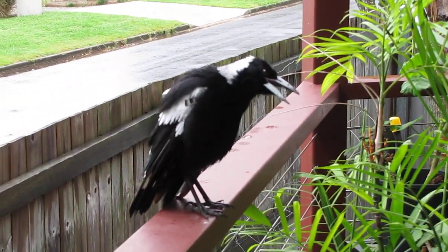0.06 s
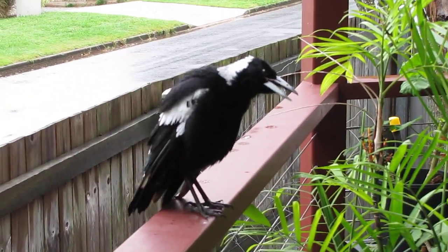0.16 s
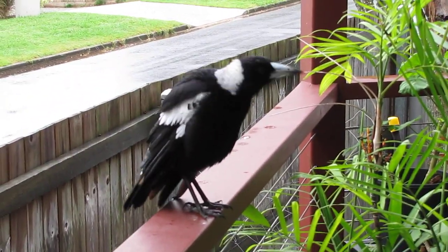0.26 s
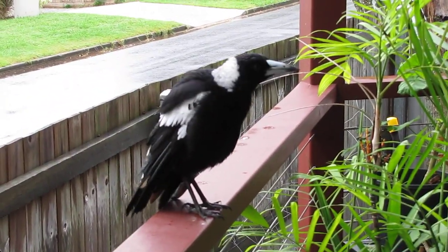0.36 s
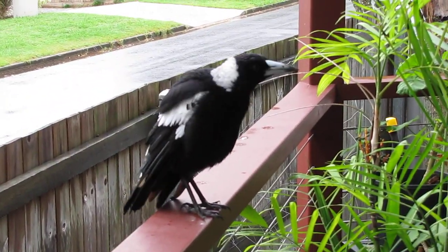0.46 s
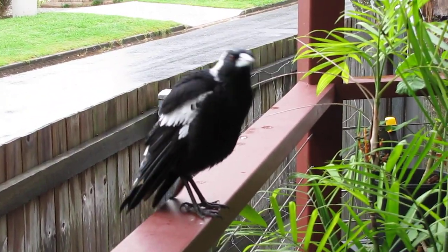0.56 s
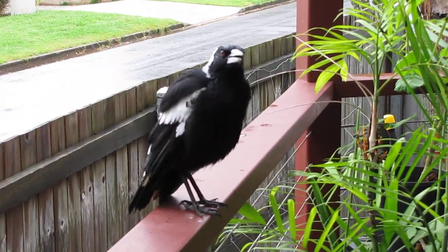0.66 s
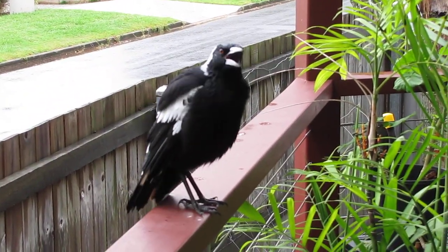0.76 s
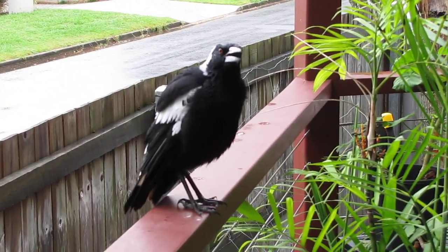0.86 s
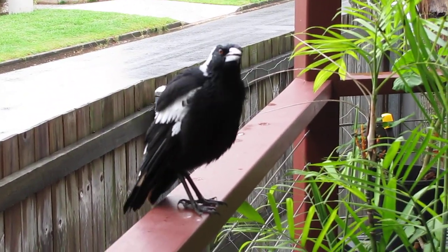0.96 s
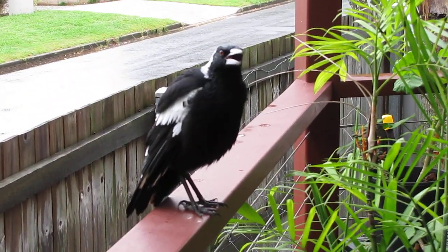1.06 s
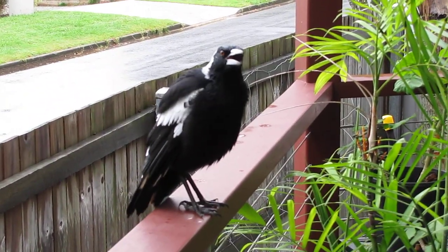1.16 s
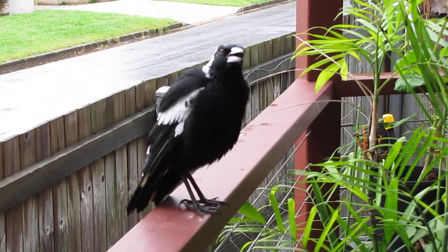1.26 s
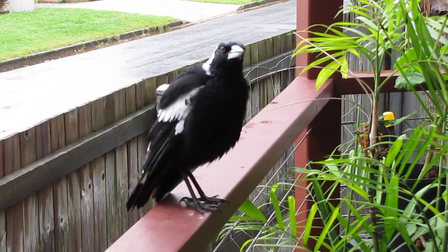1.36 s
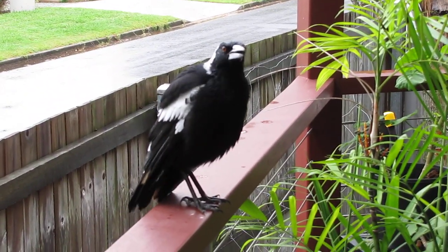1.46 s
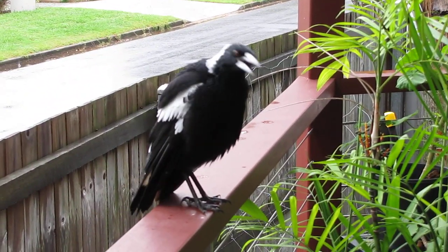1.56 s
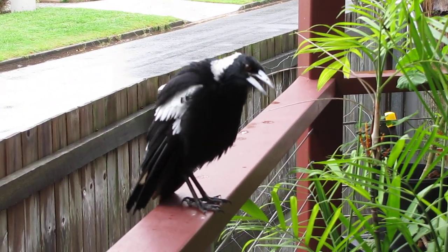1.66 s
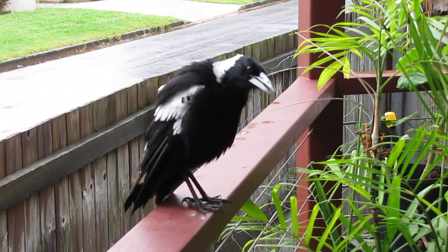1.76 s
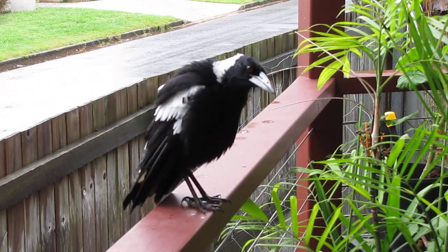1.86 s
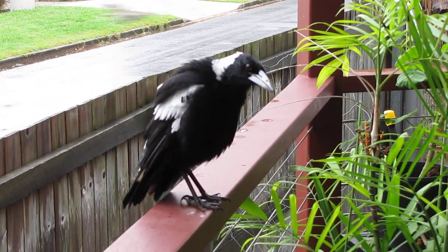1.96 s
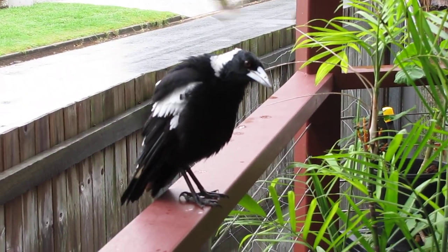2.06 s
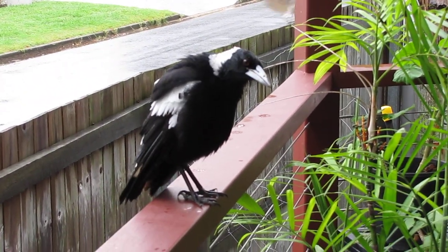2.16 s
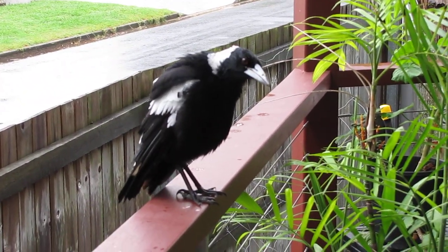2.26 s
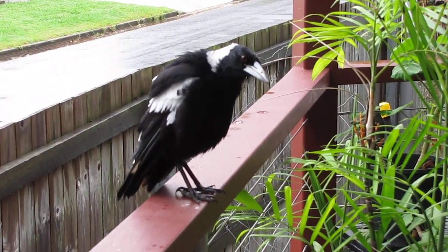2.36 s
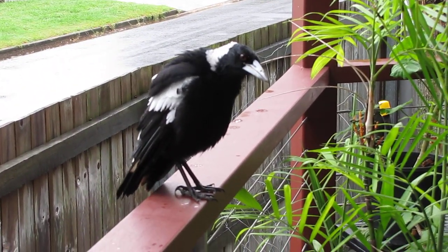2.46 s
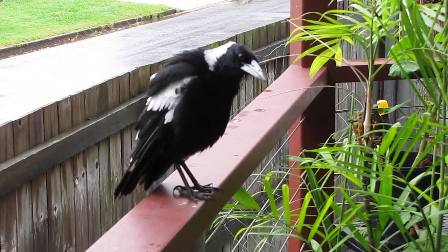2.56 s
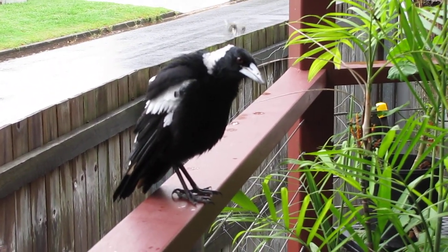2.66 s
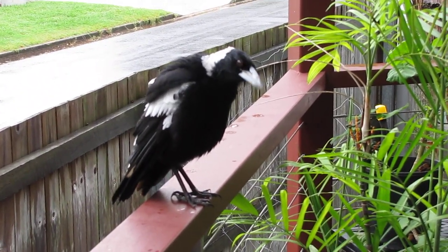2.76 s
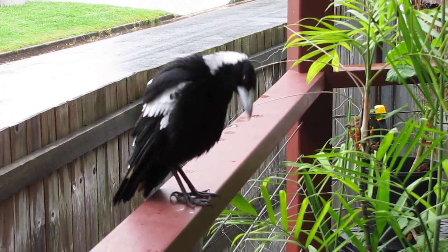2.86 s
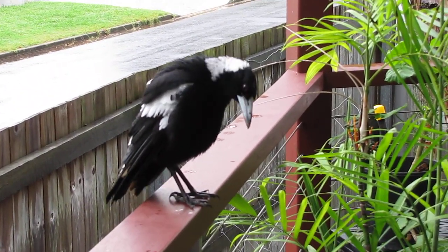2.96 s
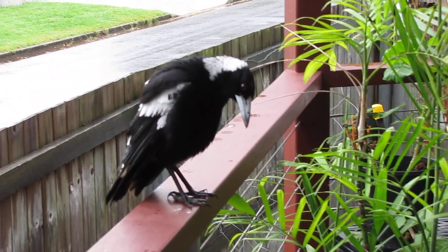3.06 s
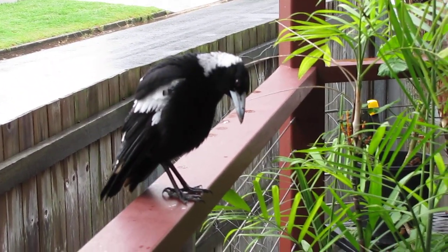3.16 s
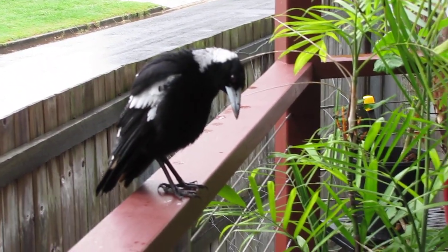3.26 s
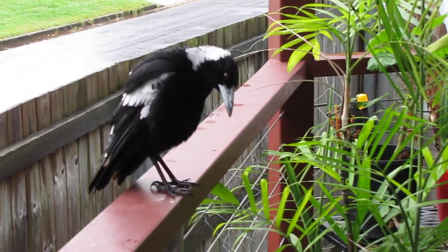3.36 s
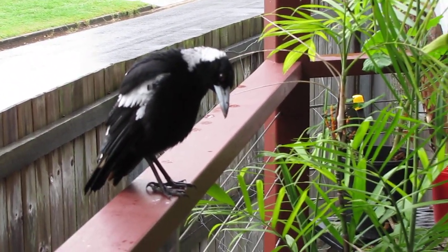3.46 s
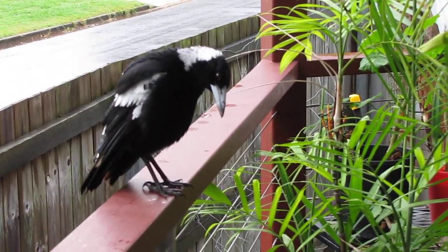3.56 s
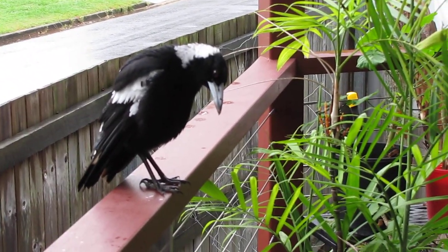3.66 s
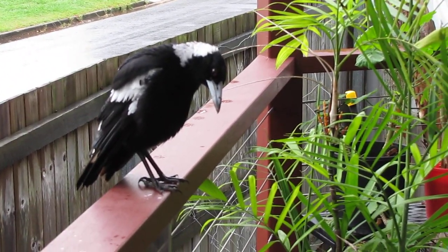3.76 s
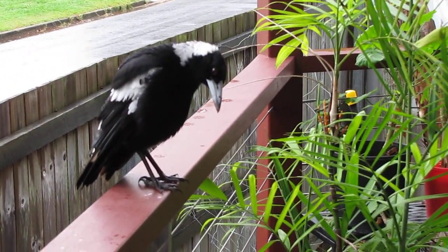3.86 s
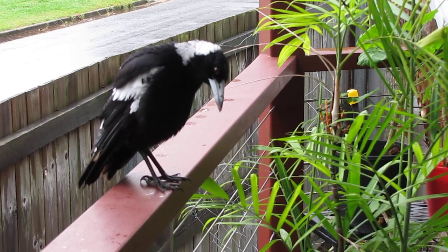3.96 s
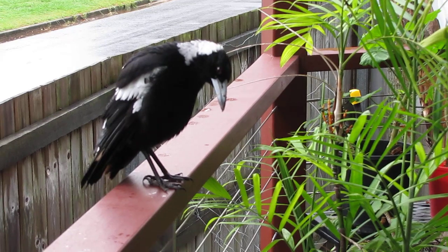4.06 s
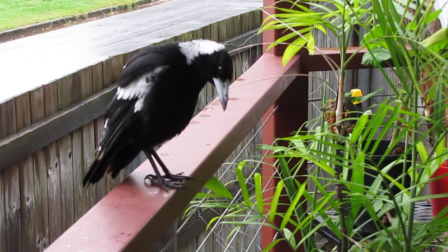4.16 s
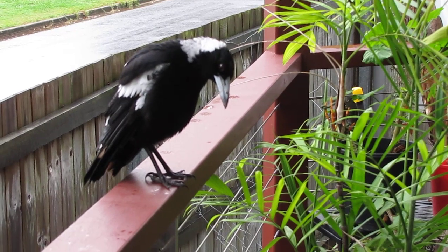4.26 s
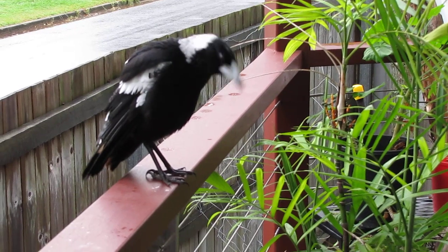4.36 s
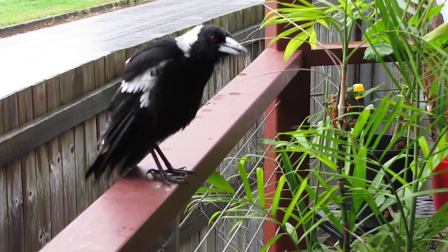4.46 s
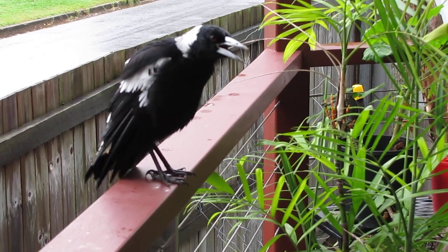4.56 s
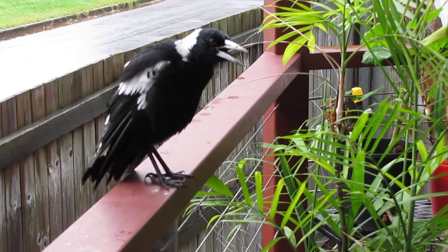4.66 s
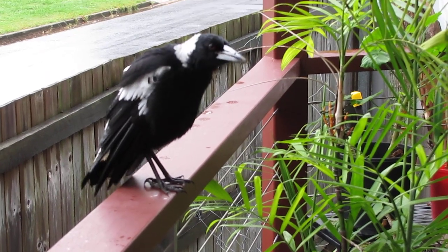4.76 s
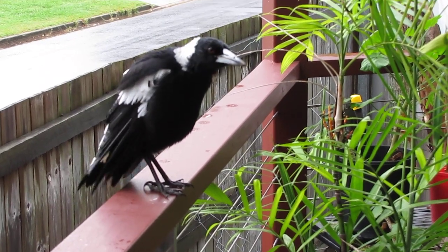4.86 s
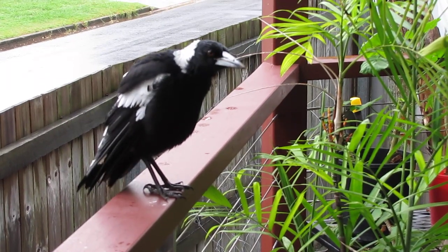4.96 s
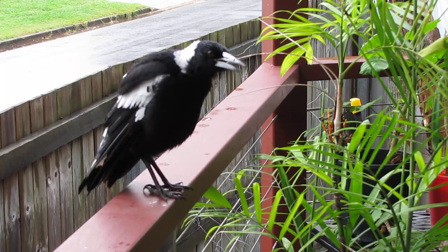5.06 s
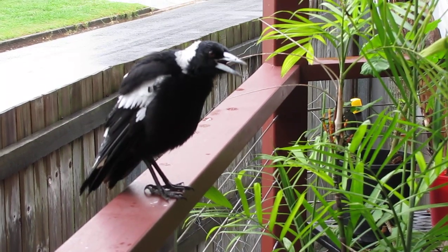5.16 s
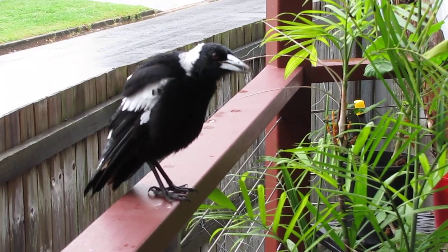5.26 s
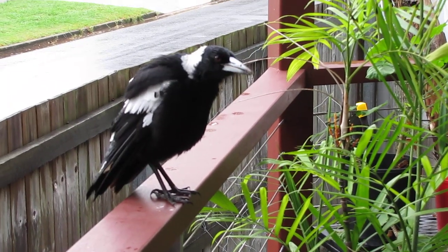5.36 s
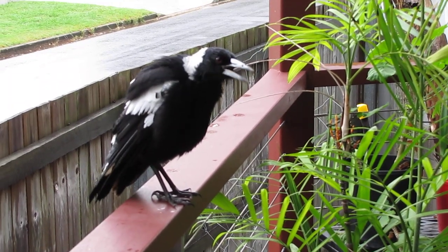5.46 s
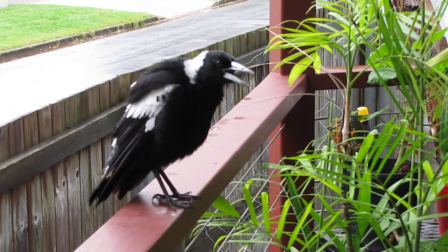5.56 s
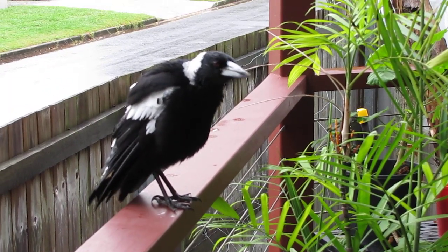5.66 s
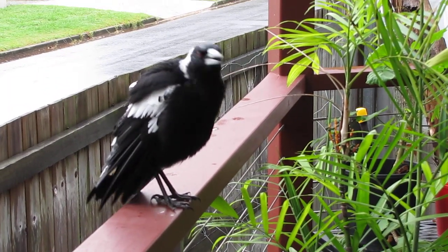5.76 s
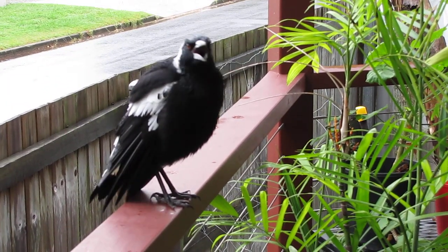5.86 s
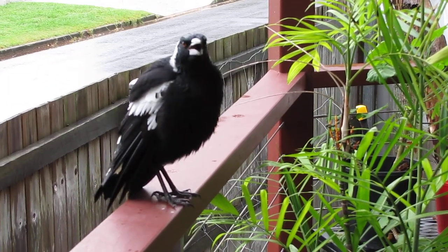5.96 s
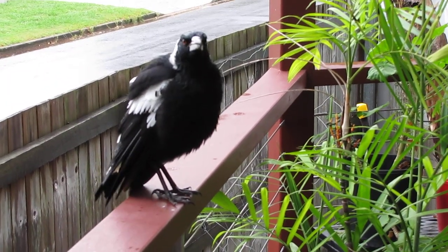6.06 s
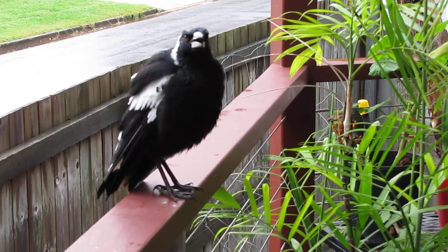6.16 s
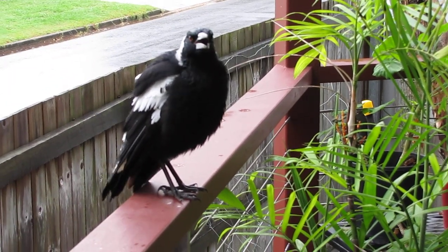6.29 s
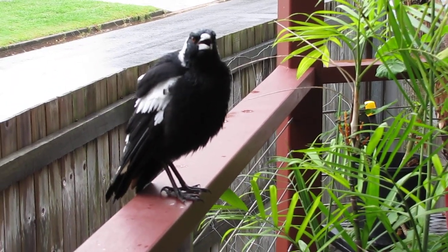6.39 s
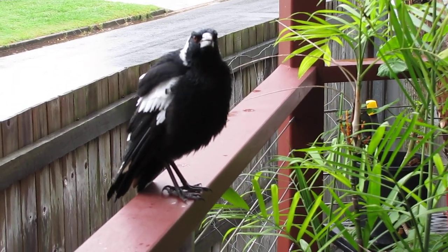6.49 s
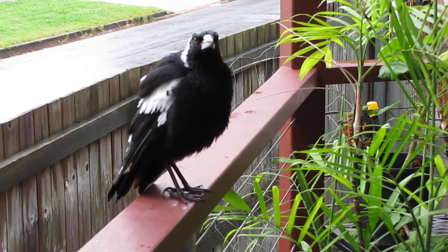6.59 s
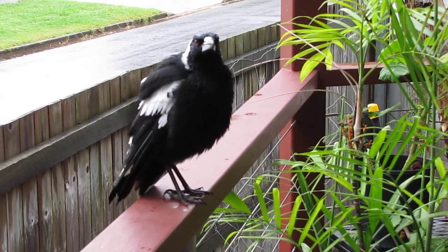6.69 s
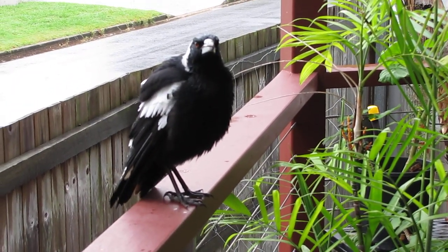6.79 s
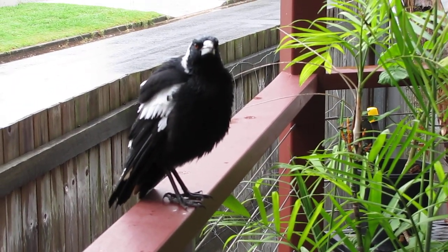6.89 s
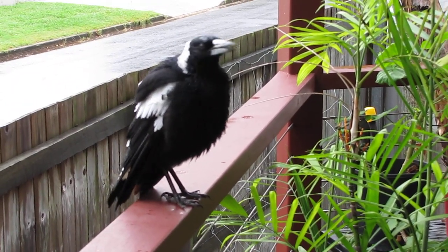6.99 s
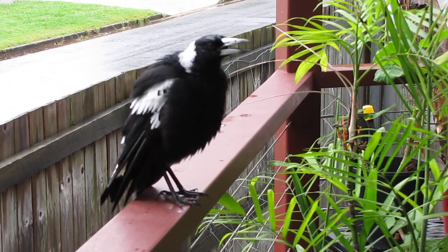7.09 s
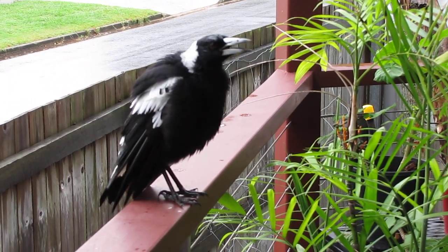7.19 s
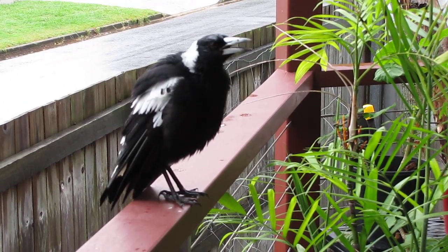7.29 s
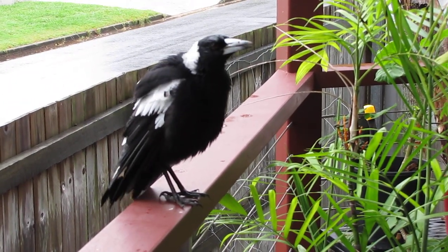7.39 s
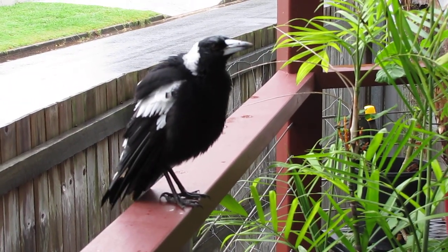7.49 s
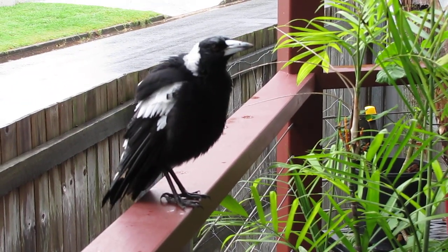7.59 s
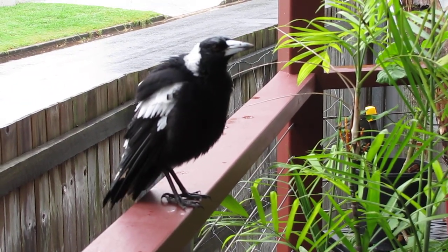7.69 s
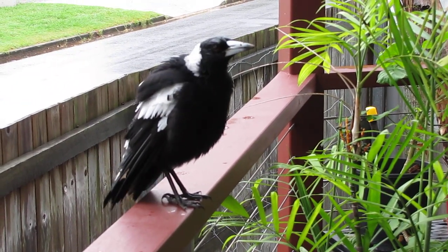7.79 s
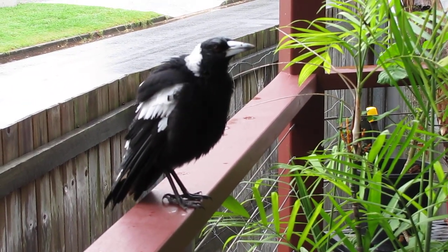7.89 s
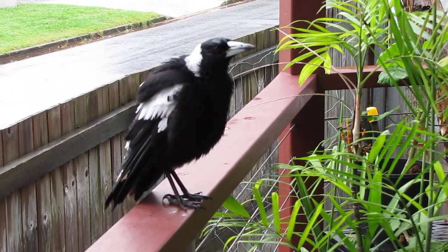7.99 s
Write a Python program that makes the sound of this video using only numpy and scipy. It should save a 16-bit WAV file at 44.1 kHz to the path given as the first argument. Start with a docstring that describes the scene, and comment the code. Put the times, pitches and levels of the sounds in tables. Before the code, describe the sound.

A single magpie calls close to a stereo microphone on a wet veranda. A harsh squawk opens, then another leads into two loud, clear falling whistles. Much softer, rising chirps chatter through the middle. Three more fluttering squawks come, then a fourth runs into a falling whistle and one last whistle ends the calling. Behind are faint low rumble, wet hiss and small drips, with short reflections from fence and wall.

```python
"""A harsh squawk opens; loud falling whistles, yelps and soft rising chatter follow from a magpie close by.
It sits on a veranda rail on a wet day. Its voice is a stack of harmonics: clean in the whistles, with a
faint rasp, and shaken by a fast flutter in the squawks. Veranda and fence answer with early copies of the
sound and a short noise tail; behind are a low outdoor rumble and a wet hiss, both coloured noise,
and a few drips made of noise bursts and short rings."""
import sys
import numpy as np
from scipy import signal
from scipy.fft import rfft, irfft, next_fast_len
from scipy.io import wavfile
from scipy.ndimage import map_coordinates

SR = 44100
rng = np.random.default_rng(int(sys.argv[2]) if len(sys.argv) > 2 else 0)


def wrap_up_sound(samples):
    """Save the sound to the file named by the first command line argument, as 16-bit audio."""
    columns = np.atleast_2d(samples).T
    # keep every value between -1 and 1, then stretch to whole-number steps
    tamed = np.clip(columns, -1, 1)
    steps = np.round(tamed * 32767).astype(np.int16)
    wavfile.write(sys.argv[1], SR, steps)


N = 354211
TIME = np.arange(N) / SR  # s
FFT_SIZE = next_fast_len(N + SR, True)
BINS = np.fft.rfftfreq(FFT_SIZE, 1 / SR)  # Hz


def amp(db):
    """Decibels to gain."""
    return 10 ** (np.asarray(db) / 20)


def unit(x):
    """Scale to rms 1."""
    return x / np.sqrt(np.mean(x ** 2) + 1e-20)


def ramp(x):
    """Keep between 0 and 1."""
    return np.clip(x, 0, 1)


def clock(length):
    """The times of the samples of one call."""
    return TIME[:int(length * SR)]


def along(points, hz):
    """(frequency [Hz], value) points read on a log frequency axis."""
    f, v = np.transpose(points)
    return np.interp(np.log(np.abs(hz) + 1), np.log(f + 1), v)


def filtered(x, response):
    """The full-length x through a response given on BINS."""
    return irfft(rfft(x, FFT_SIZE) * response, FFT_SIZE)[..., :N]


def shaped(x, gain):
    """One call through a gain that is a function of frequency."""
    m = next_fast_len(len(x) + 4096, True)
    return irfft(rfft(x, m) * gain(np.fft.rfftfreq(m, 1 / SR)), m)[:len(x)]


def wobble(rate, size=N):
    """A smooth random curve of rms 1, rate knots a second."""
    knots = rng.standard_normal(int(size * rate / SR) + 4)
    return unit(map_coordinates(knots, [TIME[:size] * rate]))


def noise(spectrum):
    """Coloured noise of rms 1."""
    return unit(filtered(rng.standard_normal(N), amp(along(spectrum, BINS))))


def turns(hz):
    """Running phase [rad] of a frequency curve."""
    return 2 * np.pi * np.cumsum(hz) / SR


def stack(pitch, gain, count):
    """Harmonics of a pitch curve, one row each, weighted by gain at their momentary frequency."""
    phase = turns(pitch)
    rows = []
    for k in range(1, count + 1):
        hz = k * pitch
        audible = hz < SR / 2
        rows.append(gain(hz) * audible * np.sin(k * phase + rng.uniform(0, 2 * np.pi)))
    return np.array(rows)


def edges(t, edge):
    """A gate that opens and closes within edge seconds."""
    return ramp(np.minimum(t, t[-1] - t) / edge)


def glide(t, start, end, bend):
    """From start to end over a call; bend 1 levels off, above 1 arches over, below 0 speeds up."""
    u = t / t[-1]
    return start + (end - start) * (u + bend * u * (1 - u))


def add(track, s, sound):
    """Mix a sound in at time s, or at the very start if s is negative."""
    part = track[max(round(s * SR), 0):][:len(sound)]
    part += sound[:len(part)]


def squawks():
    """Harsh calls, coloured by the posture of neck and bill."""
    # throat and bill in three postures: (frequency [Hz], level [dB])
    half_shut = [(700, -16.5), (1150, -14), (1550, -1.5), (2250, 3), (2850, 2), (3300, -12), (3750, -17.5),
                 (4200, -7.5), (4550, -17), (4900, -9), (5300, -14), (6400, -7.5), (7500, -21.5),
                 (8500, -20), (11500, -29.5), (15000, -39)]
    neck_stretched = [(900, -11.5), (1500, -3), (2050, -1.5), (2400, 16), (2750, 6), (3100, -3), (3400, -7),
                      (3900, -14), (4650, -17.5), (5000, -22), (5450, -3.5), (6400, -16), (7100, -13.5),
                      (9000, -28.5), (11500, -29), (15500, -40)]
    bill_wide = [(900, -25), (1550, -6.5), (2300, 2), (2800, 2), (3100, -8.5), (3500, -7.5), (4400, -14),
                 (5000, -8), (5700, -1), (6500, -7.5), (7200, -9.5), (9000, -19.5), (11500, -22),
                 (15500, -33)]
    # calls: (time [s], length [s], attack [s], swell [dB], release [s], level [dB], start [Hz], end [Hz],
    # bend, sag after [s], sag [Hz], start flutter [Hz], end flutter [Hz], start roughness [0-1],
    # end roughness [0-1], treble against body [dB], posture)
    calls = [(-.004, .18, 0.17, 7, 0.071, -16, 1097, 1169, -0.37, 0.034, 30.2, 153.9, 158, 0.39, 0.33, -2, "half shut"),
             (0.685, 0.18, 0.053, 15, 0.05, -15.5, 1535, 1360, -0.85, .1, 43.6, 167.4, 158.6, 0.6, 0.48, -5, "stretched"),
             (4.525, 0.18, 0.032, -1.5, 0.02, -16, 1100, 1191, 1.36, 0.12, 56, 165.6, 150.5, 0.51, 0.21, 1.5, "half shut"),
             (5.059, 0.17, 0.12, 27.5, 0.059, -16, 1145, 1230, -0.59, 0.068, 64, 149, 146, 0.78, 0.31, -2.5, "half shut"),
             (5.43, 0.17, 0.11, 13.5, 0.04, -16.5, 1733, 1386, 0, 0.0325, 57.4, 167.2, 143.2, 0.83, 0.36, -6, "wide open"),
             (5.772, 0.2, 0.15, 17, 0.061, -15, 1997, 1490, 0.7, 0.077, 80, 200.5, 153.3, 0.77, 0.4, -3.5, "wide open")]
    postures = {
        "half shut": dict(throat=half_shut, split_hz=2400, swing=0.089, throb_db=2.5,
                          jitter=0.037, chaos=0.33, low_sway=0.79),
        "stretched": dict(throat=neck_stretched, split_hz=3900, swing=0.09, throb_db=0.6,
                          jitter=0.031, chaos=0.28, low_sway=1.3),
        "wide open": dict(throat=bill_wide, split_hz=4130, swing=0.11, throb_db=1.5,
                          jitter=0.037, chaos=1.5, low_sway=1.19)}
    out = np.zeros(N)
    for s, *row, posture in calls:
        add(out, s, squawk(row, **postures[posture]))
    return out


def squawk(row, throat, split_hz, swing, throb_db, jitter, chaos, low_sway):
    """A fast flutter of the syrinx swings pitch and loudness, so each harmonic splits into sidebands."""
    (length, attack, swell_db, release, level_db, start_hz, end_hz, bend, sag_at, sag_hz,
     flutter_from, flutter_to, rough_from, rough_to, treble_db) = row
    fade_db, curve = 13, 1.97  # drop over the release; bow of attack and release
    treble_lag_db, treble_lag_s = 12.5, 0.072  # the call starts dull and brightens
    calm_onset, calm_s = 0.37, 0.029  # share of the swing missing at the start, and for how long
    sag_s = 0.02786  # the pitch sags briefly in mid-squawk
    t = clock(length)
    shake = lambda rate: wobble(rate, size=len(t))

    fade = ramp(1 - (length - t) / release) ** curve
    db = level_db - swell_db * ramp(1 - t / attack) ** curve - fade_db * fade
    rough = glide(t, rough_from, rough_to, 0)
    flutter_hz = glide(t, flutter_from, flutter_to, bend=0.21) * (1 + 0.137 * rough * shake(204))
    flutter = turns(flutter_hz)

    # the pitch lingers at both ends of its swing
    grip = 1 - ramp(calm_onset) * np.exp(-(t / calm_s) ** 2)
    sway = grip * (swing * np.tanh(1.32 * np.sin(flutter)) + jitter * rough * shake(700))
    centre = glide(t, start_hz, end_hz, bend) - sag_hz * np.exp(-((t - sag_at) / sag_s) ** 2)
    pitch = centre * (1 + sway)
    throb = amp(throb_db * np.cos(flutter + 0.67) + 2 * rough * shake(341.5))

    # each harmonic waxes and wanes on its own; the fundamental sways by its own share
    overtones = stack(pitch, lambda hz: amp(2 * shake(70)), count=13)[1:].sum(axis=0)
    fundamental = amp(2 * shake(92.3)) * np.sin(turns(centre * (1 + low_sway * sway)))
    source = unit(fundamental + overtones)
    # at its roughest the cycles alternate irregularly and fill the gaps between harmonics
    source = source * (1 + chaos * (grip * rough) ** 2 * shake(501) * np.sin(turns(pitch) / 2))
    air = amp(-25) * rng.standard_normal(len(t))
    voice = shaped(throb * (source + air), lambda hz: amp(along(throat, hz)))

    # the treble comes up after the start and drops away in the release
    body = shaped(voice, lambda hz: 1 / (1 + (hz / split_hz) ** 12))
    bright = amp(treble_db - treble_lag_db * np.exp(-t / treble_lag_s) - 11 * fade)
    balanced = (unit(body) + bright * unit(voice - body)) / np.sqrt(1 + bright ** 2)
    return edges(t, edge=0.002) * amp(db) * balanced


def whistles():
    """Each whistle breaks in with a low yelp and a swoop from above onto its top pitch."""
    # they sag to a knee, then fall faster; each opens and closes softly within 11 ms:
    # (time [s], length [s], attack [s], level [dB], top [Hz], knee after [s], knee [Hz], end [Hz],
    # break after [s], break width [s], break dip [dB], shudder [Hz], second harmonic [dB],
    # third harmonic [dB], yelp lead [s], yelp level [dB])
    calls = [(1.02, 0.26, 0.13, -11.5, 2434, 0.14, 2292, 1982, 0.2, 0.014, 8, 89.6, 0.5, 3.5, 0.027, -32),
             (1.481, .289, 0.16, -13.5, 2374, 0.12, 2223, 1943, 0.17, 0.037, 5.5, 41.5, 0.5, 0.5, 0.038, -39),
             (6.182, 0.27, 0.15, -12, 2342, .205, 2136, 1964, 0.21, 0.021, 10.5, 70.3, 2, 4, 0.035, -30),
             (7.051, 0.31, 0.19, -12, 2297, 0.15, 2211, 1914, 0.1934, 0.017, 11, 89.2, 1.5, 3, 0.041, -29.5)]
    yelp_s, swoop_s, swoop_hz, swoop_db = 0.022, 0.029, 3460, -4  # swoop level is against the yelp
    out = np.zeros(N)
    for s, length, attack, level_db, top_hz, *shape, yelp_lead, yelp_db in calls:
        yelp_pitch = glide(clock(yelp_s), 2200, 1847, bend=0.26)
        yelp = note(yelp_pitch, rough=0.31, upper_hz=5900, upper_db=-7, tilt=.8)
        swoop_pitch = glide(clock(swoop_s), swoop_hz, top_hz, bend=-0.24)
        swoop = note(swoop_pitch, rough=0.41, upper_hz=6000, upper_db=-5.5, tilt=0.52)
        add(out, s - yelp_lead, amp(yelp_db) * yelp)
        add(out, s - .8 * swoop_s, amp(yelp_db + swoop_db) * swoop)
        add(out, s - .004, whistle(length + 0.0038, attack, level_db, top_hz, *shape))
    return out


def whistle(length, attack, level_db, top_hz, knee_s, knee_hz, end_hz, break_s, break_width, dip_db,
            shudder_hz, second_db, third_db):
    """A swelling, falling tone that stumbles at a register break, with a faint rasp between its harmonics."""
    # the throat colours the second and third harmonics: (frequency [Hz], level [dB])
    throat = [(3800, -28.5), (4200, -21.5), (4450, -24.5), (4700, -10), (4900, -19.5), (5650, -17),
              (6050, -17.5), (6500, -21), (6900, -21.5), (7300, -38.5)]
    # higher overtones beside the third: (frequency [Hz], level [dB])
    overtone_levels = [(7600, -18.5), (8500, -7.5), (9600, -20.5), (11300, -15.5), (13500, -23.5),
                       (16000, -34)]
    # colour of the rasp: (frequency [Hz], relative level [dB])
    rasp_colour = [(500, -53), (1150, -7.5), (1700, -11), (2300, -22), (2800, -10), (3400, -6.5),
                   (4000, -5), (5000, -11.5), (5700, 0), (7500, -11), (9000, -10.5), (12000, -17),
                   (16000, -17)]
    swell_db, curve, overtone_swell = 15.5, 2, 0.57  # crescendo, its bow, the overtones' share of it
    overshoot_hz, settle_s = 94.3, 0.0137  # it starts sharp and settles
    break_drop_hz = 51.6  # the pitch steps down at the break
    break_bright_db = 4  # there, the fundamental dips and the third harmonic grows louder
    shudder_db, shudder_s = 5, 0.059  # depth and life of the shudder after the break
    rasp_db, rasp_fade_db = -55, 11.5  # before the mixing gains below; loss after the knee
    t = clock(length)
    shake = lambda rate: wobble(rate, size=len(t))

    stumble = np.exp(-((t - break_s) / break_width) ** 2)
    broken = ramp(.5 + (t - break_s + break_width / 2) / (2 * break_width))
    pitch = np.interp(t, [0, knee_s, length], [top_hz, knee_hz, end_hz])
    pitch += overshoot_hz * np.exp(-t / settle_s) - break_drop_hz * broken
    unsteady = (.0018 + .008 * stumble) * shake(170) + .0018 * shake(900)
    phase = turns(pitch * (1 + unsteady))

    effort = -swell_db * ramp(1 - t / attack) ** curve
    shudder_phase = turns(shudder_hz * (1 + 0.28 * shake(40)))
    shudder = shudder_db * broken * np.exp(-np.abs(t - break_s) / shudder_s) * np.sin(shudder_phase)
    overtone = lambda k: overtone_swell * effort + along(throat, k * pitch) + 3.0 * shake(55.7)
    third = third_db + overtone(2.983)
    levels = [effort + shudder + stumble * (1.36 * shake(172) - dip_db),
              second_db + overtone(2.032),
              third + break_bright_db * stumble]
    levels += [third + along(overtone_levels, k * pitch) + 2 * shake(23.1) for k in range(4, 9)]
    harmonics = [amp(level_db + db) * np.sin(k * phase) for k, db in enumerate(levels, 1)]
    tone = np.sqrt(2) * sum(harmonics)

    # alternate cycles differ at random, which puts fuzzy lines halfway between the harmonics
    halves = sum(shake(455.7) * np.sin((k + .5) * phase) for k in range(7))
    airy = lambda x: unit(shaped(x, lambda hz: amp(along(rasp_colour, hz))))
    rattle = amp(4 * shake(160))
    rasp = rattle * (0.62 * airy(halves) + 1.55 * airy(rng.standard_normal(len(t))))
    rasp_gain = 2 * amp(rasp_db - rasp_fade_db * ramp((t - knee_s) / .04))
    return edges(t, edge=0.011) * (tone + rasp_gain * rasp)


def yelps():
    """Brief hoarse notes, ahead of a squawk or on their own: gliding harmonics with a jittered pitch."""
    # (time [s], length [s], start [Hz], end [Hz], level [dB], roughness [0-1])
    calls = [(4.509, 0.019, 1950, 2126, -28, 0.5), (5.053, 0.024, 2080, 1850, -40, .72),
             (6.734, .05, 2040, 1870, -38.5, 0.79)]
    out = np.zeros(N)
    for s, length, start_hz, end_hz, db, rough in calls:
        pitch = glide(clock(length), start_hz, end_hz, bend=0.43)
        add(out, s, amp(db) * note(pitch, rough, upper_hz=5640, upper_db=-37, tilt=1.9))
    return out


def chirps():
    """Soft, grainy rising chatter: arched chirps, then notes that creep up and end in a flick."""
    # arched chirps: (time [s], length [s], end [Hz], level [dB], upper throat resonance [Hz], its level [dB])
    arches = [(2.067, 0.057, 3440, -44, 6000, -12), (2.186, 0.086, 3780, -46.5, 7400, -12.5),
              (2.324, 0.077, 3610, -46, 7850, -18), (2.484, 0.077, 3500, -41.5, 7250, -18.5),
              (2.659, 0.074, 3536, -41.5, 6900, -17), (2.895, 0.11, 3755, -47, 6500, -12.5),
              (3.417, 0.042, 2853, -37, 5840, 2)]
    # flicks: (time [s], length [s], start [Hz], end [Hz], level [dB], upper throat resonance [Hz],
    # its level [dB])
    flicks = [(3.655, .057, 1418, 3810, -33, 5600, 6.5), (3.782, 0.065, 1074, 2543, -37.5, 4140, -5.5),
              (3.945, 0.067, 1034, 2890, -36, 4600, -12.5), (4.099, .072, 996, 3350, -32.5, 4400, -25),
              (4.277, 0.077, 1061, 3285, -35, 4430, -19)]
    creep, power = 0.23, 3.6  # slow share of a flick's rise, steepness of the rest
    out = np.zeros(N)
    for s, length, end_hz, db, upper_hz, upper_db in arches:
        pitch = glide(clock(length), 1517, end_hz, bend=1.55)
        add(out, s, amp(db) * note(pitch, 0.22, upper_hz, upper_db))
    for s, length, start_hz, end_hz, db, upper_hz, upper_db in flicks:
        u = clock(length) / length
        pitch = start_hz + (end_hz - start_hz) * (creep * u + (1 - creep) * u ** power)
        add(out, s, amp(db) * note(pitch, 0.26, upper_hz, upper_db, swell_db=14, tilt=0.55))
    return out


def note(pitch, rough, upper_hz, upper_db, swell_db=0, tilt=0):
    """A short grainy note of rms 1 through two throat resonances; harmonic k falls as k to the power tilt."""
    n = len(pitch)
    u = np.linspace(0, 1, n)
    peak = lambda hz, centre, octaves: 1 / (1 + (np.log2(hz / centre) / octaves) ** 2)
    lower = lambda hz: peak(hz, 2650, 0.49) / (1 + (hz / 4000) ** 6)
    upper = lambda hz: amp(upper_db) * peak(hz, upper_hz, 0.43) / (1 + (hz / 13000) ** 6)
    swell = np.abs(np.sin(np.pi * u)) ** .7 * amp(swell_db * u + 3 * wobble(260, size=n))
    grainy_pitch = pitch * (1 + 0.11 * rough * wobble(793, size=n))
    gain = lambda hz: (lower(hz) + upper(hz)) * (pitch / hz) ** tilt
    return unit(stack(grainy_pitch, gain, count=6).sum(axis=0) * swell)


def linger(x):
    """Two narrow bands of the chatter hang in the air: a decaying noise tail through band filters."""
    # (centre [Hz], width between the -6 dB points [Hz], level [dB])
    narrow_bands = [(4080, 150, -1), (5400, 230, -4)]
    t60 = 0.72  # s
    t = clock(.6)
    bands = sum(amp(db - 6 * ((BINS - hz) / (width / 2)) ** 2) for hz, width, db in narrow_bands)
    tail = rng.standard_normal(len(t)) * amp(-60 * t / t60)
    return filtered(signal.fftconvolve(x, tail / np.linalg.norm(tail))[:N], bands)


def drips():
    """Drops hit rail and leaves: a soft splash of noise and a very short ring."""
    # drips and ticks: (time [s], level before the trim and colouring below [dB], pitch [Hz])
    drops = [(1.8484, -30.5, 1880), (2.16, -31, 3200), (2.3003, -29, 3010), (2.5842, -29, 1160),
             (2.595, -46, 1490), (2.7975, -31, 1560), (3.0245, -29, 2050), (4.4002, -24, 2060),
             (6.9404, -35, 2890)]
    out, t = np.zeros(N), np.arange(SR // 20) / SR
    for s, db, hz in drops:
        splash = 0.72 * rng.standard_normal(len(t)) * amp(-60 * t / 0.16)
        ring = .5 * np.sin(2 * np.pi * hz * t) * amp(-60 * t / 0.065)
        add(out, s, amp(db - 13.0) * (splash + ring))
    return filtered(out, amp(along([(3000, 7.0), (14000, -13)], BINS)))


def yard(x, tail_db):
    """Rail, posts, wall and fence throw back early copies; the yard adds a short tail of decaying noise."""
    # early reflections: (delay [s], level [dB], share of the sound that goes left [0-1])
    walls = [(.0027, -14, 0.51), (.0132, -15, 0.86), (0.0203, -21, 0.73), (.031, -34.5, 0.31),
             (0.046, -45, .45), (0.07, -23.5, 0.43)]
    # time the tail takes to fall by 60 dB: (frequency [Hz], t60 [s])
    decay = [(500, 0.21), (2200, 0.35), (6000, 0.27), (12000, 0.29)]
    hz, t, z = signal.stft(rng.standard_normal((2, SR * 3 // 5)), SR, nperseg=256)
    colour = amp(along([(1200, -1.5), (2500, -4), (6000, -0.5), (13000, -6.5)], hz))[:, None]
    fall = amp(-60 * t / along(decay, hz)[:, None])
    tail = signal.istft(z * fall * colour, SR, nperseg=256)[1]
    tail = tail[0] + 0.71 * np.array([tail[1], -tail[1]])  # middle plus and minus side
    tail *= ramp(np.arange(tail.shape[1]) / SR / 0.0033)  # fades in over 3.3 ms
    response = amp(tail_db) * tail / np.linalg.norm(tail[0])
    for delay, db, left in walls:
        response[:, int(delay * SR)] += 2 * amp(db) * np.array([left, 1 - left])
    return signal.fftconvolve(x[None], response, axes=1)[:, :N]


def background():
    """Distant rumble and wet hiss: coloured noise, swelling and sinking together."""
    # swell of the whole background: (time [s], level [dB])
    swell = [(0, -1.5), (.6, 3), (1.3, -1), (2, -1), (2.6, 3), (3.3, 4.5), (3.9, 7.5), (4.5, 10),
             (4.58, -3.5), (5.3, 3.5), (6.6, .5), (8.03, 2)]
    # colour of the rumble: (frequency [Hz], relative level [dB per Hz])
    rumble_colour = [(12, -43), (20, -9), (75, 2.5), (107, -4), (169, -2), (203, -6.5), (245, -7),
                     (381, -15), (600, -12.5), (780, -13), (1320, -120)]
    # colour of the hiss: (frequency [Hz], relative level [dB per Hz])
    hiss_colour = [(250, 0.5), (500, -5), (1000, 5.5), (1800, 6.5), (3000, -0.5), (4300, -6.5), (5500, -6),
                   (7500, -14), (11000, -18.5), (15500, -27)]

    def stereo(spectrum, side_db):
        """Noise in the middle, with separate noise of opposite sign on the two sides."""
        mid, side = noise(spectrum), amp(side_db) * noise(spectrum)
        return np.array([mid + side, mid - side])

    hiss = amp(-53.5 + 0.16 * wobble(14)) * stereo(hiss_colour, side_db=-6)
    rumble = amp(-53.5 + wobble(14)) * stereo(rumble_colour, side_db=-41)
    return amp(np.interp(TIME, *np.transpose(swell))) * (rumble + hiss)


def scene():
    """The bird before a close pair of microphones, its echoes and the wet garden."""
    # direct sound, left minus right: (frequency [Hz], level difference [dB])
    lean = [(1200, -0.5), (1600, -2.5), (1900, -2.3), (2500, -3.5), (3700, -0.5), (4700, 2.5), (5900, 5),
            (6700, -5.5), (7400, -6.5), (8100, 1), (9000, 6.5), (10500, -4), (14000, 2)]
    # direct sound, phase by which left leads: (frequency [Hz], lead [rad])
    lead = [(1000, 0), (1500, .1), (1950, .2), (2400, -0.3), (2900, 1), (3300, 0.49), (4250, 1), (5400, 1),
            (5900, -0.7), (7000, -1.1), (7600, 1), (9000, 0.66), (9700, -0.6), (13000, .1)]
    chatter = chirps()
    bird = squawks() + whistles() + yelps() + chatter
    sides = np.array([[.5], [-.5]])  # left, right
    pair = amp(sides * along(lean, BINS)) * np.exp(1j * sides * along(lead, BINS))
    direct = filtered(bird, pair)
    drops = drips()
    # with the head lowered, more of the chatter arrives by way of the yard
    echoes = yard(bird + 0.73 * chatter + drops, tail_db=-11.5)
    return direct + drops + linger(chatter) + echoes + background()


def record(dry):
    """The highest peaks are rounded off towards 0.85 of full scale; nothing from 15.78 kHz up is kept."""
    rounded = dry / (1 + np.abs(dry / .85) ** 8) ** (1 / 8)
    return filtered(rounded, BINS < 15780)


dry = scene()
out = record(dry)
wrap_up_sound(out)
```